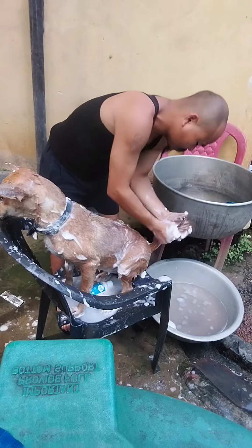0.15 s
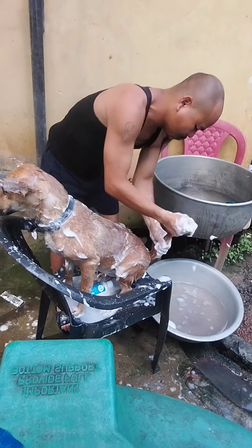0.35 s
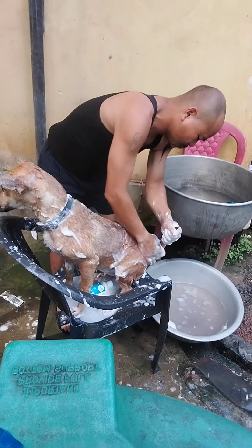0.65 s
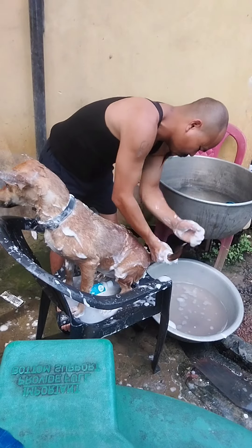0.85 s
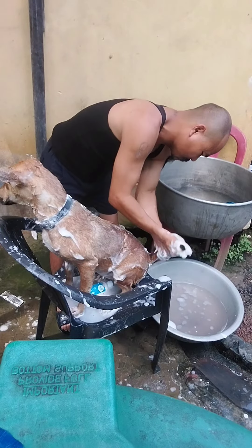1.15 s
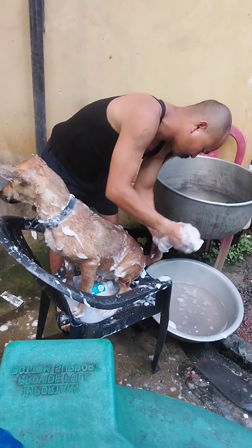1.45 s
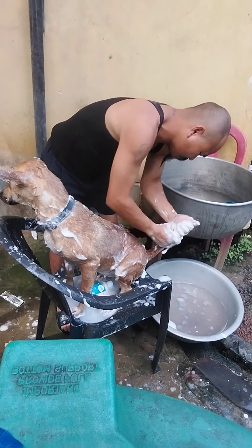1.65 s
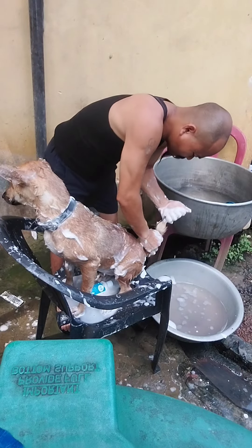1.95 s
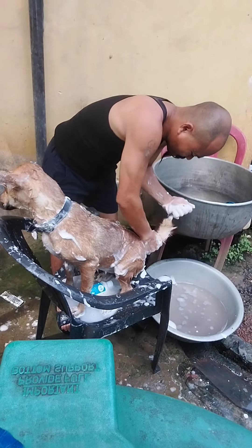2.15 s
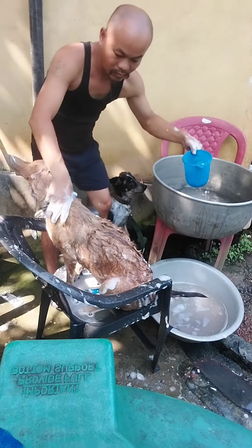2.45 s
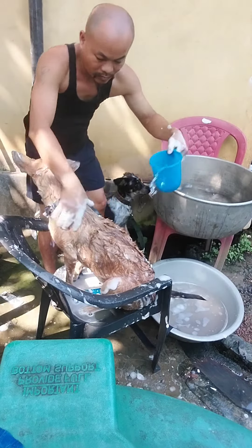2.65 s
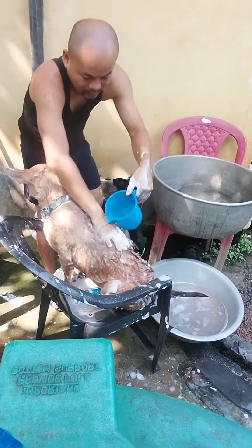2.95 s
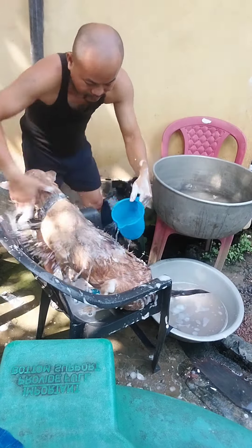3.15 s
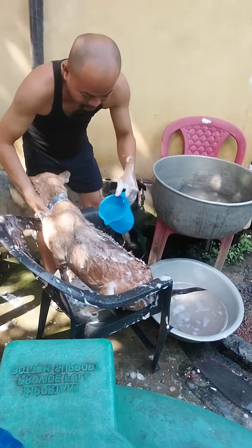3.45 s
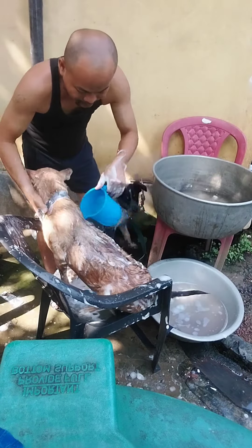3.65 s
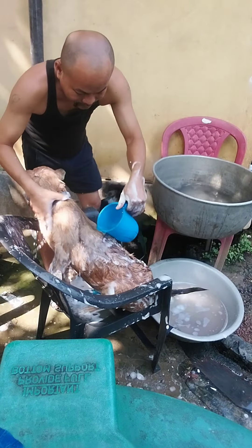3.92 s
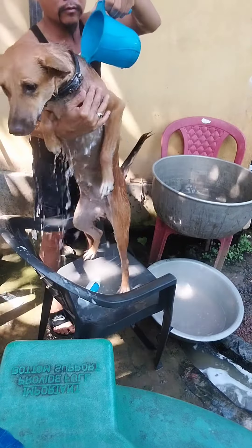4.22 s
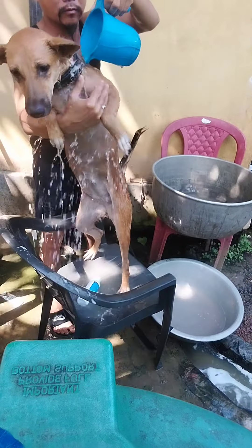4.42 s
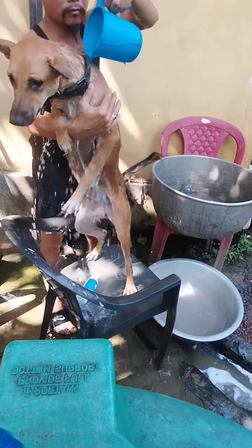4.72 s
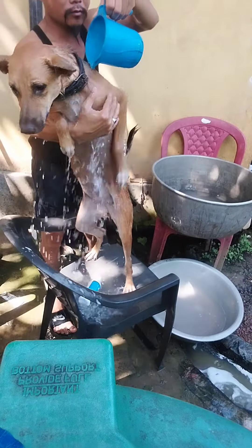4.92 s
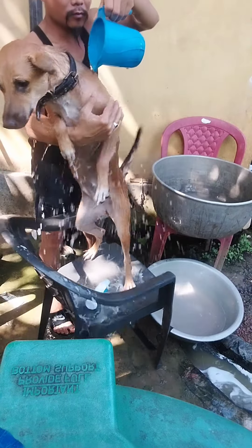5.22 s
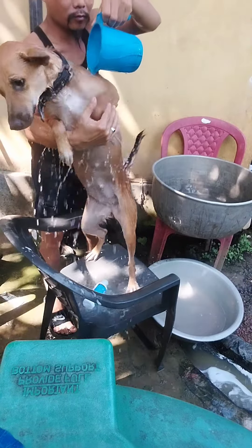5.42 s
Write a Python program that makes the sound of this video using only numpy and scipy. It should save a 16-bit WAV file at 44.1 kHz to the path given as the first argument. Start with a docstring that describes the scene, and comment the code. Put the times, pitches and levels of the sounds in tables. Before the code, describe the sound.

In a small walled yard, wet lather squelches softly through a dog's fur over a far engine drone and bird chirps. After about two seconds a jug dips with bubbly gulps, water pours and trickles, then loud splashes and hollow plastic chair thumps peak twice near the end. Close stereo microphone, slightly dull in the treble.

```python
"""Lather squelches through a dog's fur in a walled yard while a far engine drones and a bird sings; then a jug
is dipped and poured, water splashes, bubbles gulp, and paws thump on a plastic chair, hardest in two bursts
near 4.7 and 5.26 s. Water and yard are flickering bands of noise, splashes are noise bursts, bubbles are
decaying sines. The chair is a bank of ringing modes, the engine a stack of harmonics, the bird a set of
gliding sines. Walls and leaves add diffuse echoes; a stereo microphone colours it all."""
import sys
import numpy as np
from scipy import signal
from scipy.fft import rfft, irfft, next_fast_len
from scipy.io import wavfile
from scipy.ndimage import uniform_filter1d

SR = 44100
rng = np.random.default_rng(int(sys.argv[2]) if len(sys.argv) > 2 else 0)


def to_wav(s):
    """Save 16-bit WAV."""
    ch = np.atleast_2d(s).T  # columns
    pcm = np.round(np.clip(ch, -1, 1) * 32767)  # PCM
    wavfile.write(sys.argv[1], SR, pcm.astype(np.int16))


N = 246092


def amp(db):
    """Decibels to a linear factor."""
    return 10 ** (np.asarray(db) / 20)


def rms_one(x):
    """Scales a signal to an rms of 1."""
    return x / np.sqrt(np.mean(x ** 2) + 1e-20)


def in_time(rows):
    """Draws each column as a curve of straight lines over the whole scene."""
    s, *columns = np.transpose(rows)
    return [np.interp(np.arange(N) / SR, s, column) for column in columns]


def at_hz(points, hz):
    """Reads a curve at a frequency, in straight lines over log frequency."""
    return np.interp(np.log(hz), np.log(np.array(points)[:, 0]), np.array(points)[:, 1])


def drift(rate):
    """Slow random wander of rms 1: lowpassed noise on every 40th sample, joined by lines; rate in Hz."""
    r = np.exp(-80 * np.pi * rate / SR)
    noise = rng.standard_normal(N // 40 + 2002)
    slow = signal.lfilter([1], [1, -2 * r, r * r], noise)[2000:]  # skip the filter's start
    return np.interp(np.arange(N) / 40, np.arange(len(slow)), rms_one(slow))


def ring(x, hz, t60):
    """Two-pole resonance: a unit click sets a decaying sine of height 1 ringing."""
    r, w = amp(-60 / (t60 * SR)), 2 * np.pi * hz / SR
    return signal.lfilter([0, np.sin(w)], [1, -2 * r * np.cos(w), r * r], x + 1e-18)


def fade(t60, length):
    """Exponential decay that loses 60 dB in t60 seconds."""
    return amp(-60 * np.arange(int(length * SR)) / SR / t60)


def add(out, s, sound):
    """Mixes a sound in from s seconds on, cut at the end of the scene."""
    i = int(s * SR)
    out[..., i:i + sound.shape[-1]] += sound[..., :N - i]


def banded(spectrum, patchy_db, flicker, drops_per_s, drop_db):
    """Stereo noise and droplet clicks in third-octave bands that flicker partly together, partly alone; rms 1."""
    # likeness of left and right before it is stretched below: (frequency [Hz], likeness [-1..1])
    likeness = [(60, 0.84), (180, 0.86), (550, 0.68), (1650, -0.27), (4970, 0.0), (15000, -0.02)]
    hz = np.array(spectrum)[:, 0]
    edges = np.geomspace(hz[0], hz[-1], int(3 * np.log2(hz[-1] / hz[0])) + 1)
    sizes = amp(drop_db + 4.6 * np.minimum(rng.exponential(1, N), 4))
    drops = sizes * (rng.random(N) < drops_per_s / SR)
    white = rng.standard_normal((2, 2, N)) * (1 + drops)
    out, together = 0, drift(flicker)
    for k, (low, high) in enumerate(zip(edges, edges[1:])):
        band = signal.butter(2, [low, high], "band", fs=SR, output="sos")
        mid, side = signal.sosfilt(band, white[k % 2])  # neighbouring bands use different noise
        centre = np.sqrt(low * high)
        alike = np.clip(1.52 * at_hz(likeness, centre) - .42, 0, .99)
        gain = amp(at_hz(spectrum, centre) + patchy_db * (together + 0.83 * drift(flicker)))
        out = out + gain * (np.sqrt(1 + alike) * mid + np.sqrt(1 - alike) * side * [[1], [-1]])
    return rms_one(out)


def echoes(x, t60, gap):
    """A diffuse tail from walls and leaves, different at each ear, after a short gap in seconds."""
    tail = rng.standard_normal((2, SR // 2)) * fade(t60, .5) * (np.arange(SR // 2) > gap * SR)
    return signal.fftconvolve(x[None], tail / np.sqrt(np.sum(tail ** 2) / 2), axes=1)[:, :N]


def yard():
    """Low traffic rumble, and above it the rubbing of chair and tub, both as flickering noise."""
    # spectral shapes: (frequency [Hz], relative density [dB per Hz])
    rumble = [(25, -49), (40, 11.5), (58, -4), (90, 15), (140, -8), (250, -31)]
    rubbing = [(60, -41), (110, -2.5), (200, 2.5), (320, -7.5), (500, -15.5), (900, -24), (1500, -91)]
    # low sound of the yard: (time [s], rumble level [dB], rubbing level [dB])
    yard_levels = [(0.0, -57, -55.5), (0.6, -58.5, -51), (1.2, -53, -52), (2.2, -45.5, -52.5),
                   (2.3, -49, -50), (2.86, -50, -52.5), (3.31, -50, -47), (3.63, -58.5, -58),
                   (4.0, -48.5, -51.5), (4.52, -57.5, -51), (4.73, -41, -50), (4.97, -56.5, -47),
                   (5.25, -48.5, -40), (5.42, -52, -41.5), (5.58, -56, -52.5)]
    rumble_db, rub_db = in_time(yard_levels)
    return amp(rumble_db) * banded(rumble, 3.7, 3.8, 0, 0) + amp(rub_db) * banded(rubbing, 1.6, 7.6, 0, 0)


def wash():
    """A far wash of steady smooth noise, partly alike at both ears."""
    # its one band: (low edge [Hz], high edge [Hz], level [dB], end [s])
    low_hz, high_hz, db, end = (1450, 2200, -69, 2.22)
    white = rng.standard_normal((3, int(end * SR)))
    sos = signal.butter(2, [low_hz, high_hz], "band", fs=SR, output="sos")
    band = signal.sosfilt(sos, white[0] + white[1:])
    return np.pad(amp(db) * rms_one(band), ((0, 0), (0, N - band.shape[1])))


def water_levels():
    """Slosh and spray follow the hiss of the flow at offsets held through each stage of the bath."""
    # flow of lather and running water, as its hiss: (time [s], level [dB])
    flow = [(0.0, -59), (0.6, -62), (0.95, -57), (1.33, -59.5), (1.5, -62), (1.86, -66), (2.05, -60.5),
            (2.2, -57), (2.3, -52), (2.52, -51.5), (2.68, -54), (2.86, -59), (2.95, -48.5), (3.09, -55),
            (3.25, -50), (3.65, -64.5), (3.73, -54.5), (3.89, -65), (4.07, -52.5), (4.21, -61), (4.54, -54),
            (4.72, -43), (4.82, -52), (4.95, -53), (5.1, -50), (5.19, -43.5), (5.3, -47), (5.47, -56),
            (5.58, -49.5)]
    # lathering, dipping the jug, pouring, rinsing upright, scrambling, last splashing and thumping that thins out:
    # (start [s], slosh over the hiss [dB], fine spray over the hiss [dB])
    stages = [(0.0, -4.5, -17.5), (2.221, 2, -12.5), (2.8, -7, -11.5), (4.1, -4.5, -4.5), (4.6, -4.5, -7.5),
              (5.232, -1.5, -7)]
    blend_s = 0.086
    (hiss_db,) = in_time(flow)
    s, *columns = np.transpose(stages)
    now = (np.searchsorted(s, np.arange(N) / SR, side="right") - 1).clip(0)
    slosh_over, spray_over = [uniform_filter1d(column[now], int(blend_s * SR) + 1, mode="nearest")
                              for column in columns]
    return hiss_db + slosh_over, hiss_db, hiss_db + spray_over


def water(slosh_db, hiss_db, spray_db):
    """Flowing water in three layers of flickering noise strewn with droplets: slosh, hiss and fine spray."""
    # spectral shapes: (frequency [Hz], relative density [dB per Hz])
    slosh = [(250, -43), (500, -0.5), (900, 2), (1500, 0), (2200, -0.5), (3500, -37)]
    hiss = [(1200, -19), (2200, -0.5), (3200, 2.5), (4700, 7.5), (5800, -3), (7000, -4.5), (8800, -20.5)]
    spray = [(7000, -11), (8500, 16), (10000, -3), (12000, 16), (14000, 7), (17000, 17)]
    return (amp(slosh_db) * banded(slosh, 3.36, 9.7, 110.0, 3.6)
            + amp(hiss_db) * banded(hiss, 1.6, 23.0, 150., 6.5)
            + amp(spray_db) * banded(spray, 1.5, 17.0, 150., 6.4))


def plops(slosh_db):
    """Small bubbles burst at random and ring at their own pitches; only heavy sloshing makes many."""
    sizes = amp(2.5 * np.minimum(rng.exponential(1, N), 3)) * rng.choice([-1, 1], N)
    births_per_s = 500 * amp(1.5 * (slosh_db + 50) + 3 * drift(8))
    born = sizes * (rng.random(N) < births_per_s / SR)
    pitches, dealt = np.geomspace(600, 5500, num=16), rng.integers(0, 16, N)
    rings = []
    for k, hz in enumerate(pitches):
        onset = ring(born * (dealt == k), hz, 1.7 / hz)  # a short first resonance softens the start
        rings.append(ring(onset, hz, 76.0 / hz) * hz ** 1.4)
    left, right = sum(rings[::2]), sum(rings[1::2])
    both = np.array([left + 0.21 * right, right + 0.5 * left])
    return amp(-58) * rms_one(both * amp(slosh_db))


def engine():
    """Orders of a slowly rising, wavering firing rate, swelling and sinking on their long way here."""
    # (multiple of the firing rate, level [dB])
    orders = [(1, -54), (2, -51.5), (3, -54), (4, -60.5), (5, -58.5), (6, -66.5), (10, -76), (11, -73.5),
              (12, -77.5), (13, -86), (14, -77)]
    # lifts the orders in step with their height: (time [s], lift [dB per four orders])
    load = [(0.0, 0), (.75, 0.5), (1.3, 1), (1.7, -2), (2.2, 3.5)]
    start_hz, rise_hz_per_s, end_s = 54.73, 3.0, 2.22
    t, (load_db,) = np.arange(N) / SR, in_time(load)
    firing_hz = (start_hz + rise_hz_per_s * t) * (1 + 0.01224 * drift(4.83))
    phase = 2 * np.pi * np.cumsum(firing_hz) / SR
    drone = 0
    for k, db in orders:
        level = amp(db + load_db * k / 4 + 5.57 * drift(6.4))
        drone = drone + level * np.sin(k * phase + k * k)
    return drone * (t < end_s)


def splashes():
    """Each splash is a ragged burst of noise in a broad resonance, topped by fine spray."""
    # (time [s], relative body level [dB], centre [Hz], t60 [s], relative spray level [dB])
    splash_rows = [(0.399, -47, 4130, 0.57, -60), (.617, -43, 4660, 0.023, -75),
                   (1.023, -39.5, 3530, 0.091, -66), (1.7438, -46, 1720, 0.16, -83.5),
                   (2.22, -40, 1590, 0.18, -50), (2.3107, -35, 1760, 0.45, -41.5),
                   (2.458, -31.5, 5100, 0.07, -58), (2.516, -33, 2390, 0.27, -66),
                   (2.59, -40, 4400, 0.24, -50), (2.6552, -37, 2600, 0.33, -42.5),
                   (2.7013, -37.5, 2960, 0.17, -49), (2.9008, -29.5, 1940, 0.096, -40.5),
                   (2.95, -40.5, 3540, 0.29, -57), (3.21, -33, 4400, 0.022, -30.5),
                   (3.38, -45.5, 4400, 0.86, -49), (3.591, -48, 5000, 0.35, -69.5),
                   (3.686, -43.5, 1860, 0.62, -61.5), (4.0485, -37.5, 4040, 0.13, -43),
                   (4.116, -40.5, 4920, 0.83, -68), (4.4215, -38, 4330, .1, -84),
                   (4.469, -35, 4210, 0.18, -77), (4.582, -35.5, 4000, .06, -58),
                   (4.641, -24.5, 1744, 0.16, -42), (4.6424, -28, 4560, 0.25, -36),
                   (4.6733, -24, 1850, 0.26, -37), (4.711, -20.5, 1540, 0.4, -34),
                   (4.73, -33, 4750, 0.5, -63), (4.847, -26.5, 4340, 0.024, -34),
                   (4.874, -36, 3040, 0.088, -63), (4.979, -31, 3400, 0.23, -34.5),
                   (5.094, -30.5, 4400, 0.14, -37.5), (5.143, -29, 4660, 0.16, -50),
                   (5.1608, -23, 2340, 0.17, -35), (5.17, -26.5, 5100, 0.16, -58),
                   (5.217, -24.5, 4230, 0.11, -34), (5.255, -11.5, 1560, 0.23, -65),
                   (5.259, -23.5, 2880, 0.12, -52), (5.335, -30.5, 2800, 0.18, -36),
                   (5.371, -37, 4850, 0.075, -48), (5.433, -39, 3227, 0.057, -55),
                   (5.44, -41, 5300, .1, -41)]
    out, length = np.zeros((2, N)), .3
    top = signal.butter(4, 9000, "high", fs=SR, output="sos")
    for s, db, hz, t60, spray_db in splash_rows:
        noise = rng.standard_normal((3, int(length * SR)))
        drops = amp(3.4 * np.repeat(rng.standard_normal(60), 256)[:noise.shape[1]])  # drops land unevenly
        drops[:160] = amp(5.5)  # the first contact has a set strength
        burst = (noise[0] + 1.82 * noise[1:]) * fade(t60, length) * drops
        resonance = signal.butter(2, [hz / 1.367, min(hz * 1.24, 7500)], "band", fs=SR, output="sos")
        body = signal.sosfilt(resonance, burst)
        spray = signal.sosfilt(top, burst * (1 + 3 * fade(0.0017, length)))
        add(out, s, amp(db - 8.5) * body + amp(spray_db - 21) * spray)
    return out


def whistle(s, hz, db):
    """A sine gliding along its points of time, pitch and level, with soft ends."""
    t = np.arange(s[0], s[-1], 1 / SR)
    ends = np.clip(np.minimum(t - s[0], s[-1] - t) / 0.0022, 0, 1)
    phase = 2 * np.pi * np.cumsum(np.interp(t, s, hz)) / SR
    return ends * amp(np.interp(t, s, db)) * np.sin(phase)


def chirp(s, hold, top_hz, bottom_hz, db):
    """Holds at the top, drops fast, then levels out; it swells on the way down and fades."""
    fall_s, bend = 0.056, 1.9
    loudest, fade_db = 0.3, 25  # share of the fall; dB times the squared distance from there
    done = np.linspace(0, 1, num=12)
    hz = bottom_hz + (top_hz - bottom_hz) * (1 - done) ** bend
    level_db = db - fade_db * (np.r_[0, done] - loudest) ** 2
    return whistle(np.r_[s, s + hold + fall_s * done], np.r_[top_hz, hz], level_db)


def far_calls():
    """Songbird and faint tone, sines heard mostly as echoes, and a nearer bird whose peeps are drier."""
    # songbird, falling chirps: (time [s], held at the top [s], top [Hz], bottom [Hz], relative level [dB])
    chirp_rows = [(0.849, 0.02, 5690, 3106, -60), (1.283, 0.0067, 4880, 3054, -56.5),
                  (1.995, 0.00197, 5200, 3240, -56.5)]
    # its long rising whistle: (time [s], pitch [Hz], relative level [dB])
    slide_points = [(1.445, 4220, -67), (1.5, 4300, -69), (1.6, 4620, -73), (1.68, 4950, -79),
                    (1.78, 5170, -78), (1.95, 5280, -85)]
    # nearer bird: (time [s], relative level at the start [dB])
    peeps = [(.895, -53), (1.078, -52.5), (1.273, -53)]
    # a faint steady tone far off: (start [s], end [s], base pitch [Hz], relative level [dB])
    start, end, hz, db = (4.25, 4.38, 445, -91)
    # its harmonics: (multiple, added level [dB])
    tone_orders = [(1, 4), (2, -2), (3, 13), (4, 2), (5, 9)]
    rasp_db, rasp_hz = 6.5, 300
    far, near = np.zeros((2, N))
    for row in chirp_rows:
        add(far, row[0], chirp(*row))
    for k, order_db in tone_orders:
        add(far, start, whistle([start, end], [k * hz] * 2, [db + order_db] * 2))
    for s, peep_db in peeps:
        add(near, s, whistle([s, s + 0.018], [3760, 3660], [peep_db, peep_db + 4.5]))
    far = far * amp(rasp_db * drift(rasp_hz))  # chirps and tone flutter on their way through the leaves
    slide = whistle(*np.transpose(slide_points))
    add(far, slide_points[0][0], slide * amp(3 * drift(60))[:len(slide)])  # the slide flutters more gently
    return amp(-2) * far + near + echoes(amp(14.0) * far + amp(-5) * near, 0.47, 0.00085)


def touch(hard_db, depth_db):
    """A paw sinks in over a few ms and drives the low modes; claws and rattle wake the high ones."""
    # plastic chair: (nominal mode [Hz], relative level [dB], t60 [s])
    modes = [(124.6, -19.5, 0.3), (181.2, -12, 0.15), (245, 7.5, 0.054), (283.8, 1.5, 0.105),
             (402, -6, 0.094), (474, -23, 0.19), (542, 1, 0.045), (754, 5, 0.026), (925, 3, 0.016),
             (1284, -16.5, 0.067), (1363, -9, 0.042), (1580, -20, 0.06), (2800, -18, 0.049)]
    sink_s, middle_hz = 0.00059, 239
    t = np.arange(300) / SR / sink_s
    pad = t * t * np.exp(-t)
    hard = .06 * rng.standard_normal(int(.19 * SR)) * fade(.14, .19)  # rattle
    hard[0] += 1  # claw click
    soft = np.convolve(hard, pad / pad.sum())[:len(hard)]
    rings = 0
    for (hz, mode_db, t60), luck in zip(modes, rng.normal(0, 2.5, len(modes))):
        if hz > 500:
            push = amp(hard_db) * hard
        else:
            push = amp(depth_db * np.log2(middle_hz / max(hz, 180))) * soft
        # each touch shifts the level and pitch of every mode a little
        rings = rings + amp(mode_db + luck) * ring(push, hz * (1 + .012 * luck), t60)
    rings[-2000:] *= np.linspace(1, 0, num=2000)
    return rings


def chair():
    """Paws thump on the chair's ringing modes, and it rocks on with further touches after each landing."""
    # (time [s], relative level [dB], hardness [dB], strength of the rebounds [dB],
    #  depth: gain toward the low modes [dB per octave])
    thumps = [(2.222, -30.5, -13, 0.5, 4), (3.5, -41.5, -7, 8.5, -9), (4.558, -20, -16.5, 1, -6),
              (4.59, -26, -15.5, -10, -8), (4.674, -20, -11.5, 8, 0), (4.703, -27.5, 0, -12, 0),
              (4.7105, -1.5, -15.5, -17, 6), (4.727, -7, -40, -9.5, 14), (4.763, -17.5, -16.5, -5.5, 10),
              (4.883, -18.5, -18, -23, -5), (5.019, -29.5, -16, 7.5, 13), (5.079, -23.5, -28, -12, -0.5),
              (5.18, -16, -20, -16, -7), (5.198, -19.5, -18, -4, -2), (5.2574, -2, -10.5, -8, 0),
              (5.2612, -3.5, -11, -9.5, 4), (5.299, -13, -13.5, -10, 17), (5.343, -19, -14.5, 0, 11),
              (5.528, -32, -37, -2, -2), (5.572, -30.5, -14, -10, -5)]
    # (delay after the landing [s], relative level [dB])
    rebounds = [(0.0202, -7.5), (.048, -17.5), (.086, -12)]
    rebound_softer_db = 7.5  # less hardness
    out = np.zeros(N)
    touches = [(s, db, hard_db, depth_db) for s, db, hard_db, _, depth_db in thumps]
    for s, db, hard_db, again_db, depth_db in thumps:
        for lag, loss_db in rebounds:
            touches.append((s + lag, db + again_db + loss_db, hard_db - rebound_softer_db, depth_db))
    for s, db, hard_db, depth_db in touches:
        # touches due after the end start in the last millisecond
        add(out, min(s, N / SR - .001), amp(db - 6.0) * touch(hard_db, depth_db))
    dulled = signal.lfilter([.3], [1, -.7], out)
    out = signal.sosfilt(signal.butter(4, 135, "high", fs=SR, output="sos"), dulled)
    return (out + amp(-19.5) * echoes(out, 0.15, 0.01)) * amp([[.6], [-.6]])


def gurgles_and_rushes():
    """Noise swelling in a resonance: low rows gurgle, high rows are narrow rushes of splashing water."""
    # (start [s], end [s], centre [Hz], relative level [dB])
    swell_rows = [(3.16, 3.33, 269, -47.5), (3.274, 3.42, 350, -41.5), (3.871, 4.133, 308, -50),
                  (2.235, 2.348, 317, -47), (2.58, 2.713, 282, -47.5), (2.656, 2.739, 1130, -50.5),
                  (2.40, 2.47, 2070, -49), (2.474, 2.526, 1370, -46), (2.597, 2.687, 4050, -55),
                  (3.56, 3.644, 4200, -57), (3.655, 3.782, 1550, -56), (5.164, 5.191, 4970, -33.5)]
    out = np.zeros(N)
    for start, end, hz, db in swell_rows:
        swell = np.hanning(int((end - start) * SR))
        resonant_noise = rms_one(ring(rng.standard_normal(len(swell)), hz, 26.5 / hz))
        add(out, start, amp(db) * swell * resonant_noise)
    return out


def bubbles():
    """A trapped pocket of air rings some thirty cycles and rises in pitch as it nears the surface."""
    # the largest bubbles and drops: (time [s], relative level [dB], starting pitch [Hz])
    bubble_rows = [(2.25, -34.5, 997), (2.26, -44, 4200), (2.269, -39, 856), (2.269, -29, 4570),
                   (2.308, -16, 1063), (2.324, -23.5, 3720), (2.366, -25.5, 1097), (2.39, -25, 1690),
                   (2.411, -26.5, 1990), (2.429, -31, 1930), (2.46, -24, 4800), (2.461, -32, 5600),
                   (2.495, -28, 756), (2.516, -26, 3460), (2.519, -30.5, 716), (2.545, -29.5, 1740),
                   (2.59, -41.5, 487), (2.657, -22, 3950), (2.66, -37, 1180), (2.70, -34, 2750),
                   (2.794, -41, 950), (2.901, -34, 1930), (2.92, -32, 1860), (3.701, -38, 1510),
                   (4.049, -40.5, 1610), (4.613, -24.5, 3000), (4.642, -25.5, 1500), (4.743, -33, 5100),
                   (4.875, -27.5, 3000), (5.065, -28, 2630), (5.193, -22, 1740), (5.214, -19.5, 2800),
                   (5.223, -25, 1340), (5.335, -29, 2880)]
    rise_s, big_rise_s, big_db = 0.0026, 0.00056, -22  # the loud, big ones burst almost at once
    out, t = np.zeros(N), np.arange(int(.15 * SR)) / SR
    for s, db, hz in bubble_rows:
        onset = 1 - np.exp(-t / (big_rise_s if db > big_db else rise_s))
        shape = fade(23.6 / hz ** .97, .15) * onset
        add(out, s, amp(db + 1.5) * shape * np.sin(2 * np.pi * hz * (t + 1.0 * t * t)))
    return (out + amp(-1.5) * echoes(out, 0.12, 0.0016)) * amp([[2.5], [-2.5]])


def scene():
    """Sums yard, water, engine, calls and paws in stereo."""
    slosh_db, hiss_db, spray_db = water_levels()
    background = yard() + wash() + engine() + far_calls()
    flowing = water(slosh_db, hiss_db, spray_db) + plops(slosh_db)
    return background + flowing + splashes() + chair() + gurgles_and_rushes() + bubbles()


def record(dry):
    """The microphone dips in the treble, its two ports differ in colour; peaks are rounded, the top is cut."""
    # (frequency [Hz], left minus right [dB])
    ports = [(60, -3), (120, -2), (240, -1.5), (480, -8), (950, -2.5), (1890, 0.5), (3770, -8),
             (7520, -9.5), (15000, 1.5)]
    # treble dip: (frequency [Hz], gain [dB])
    mic_dip = [(6000, -1.5), (7300, -7), (8300, -19), (9300, -9), (11000, 0)]
    cutoff_hz = 15850
    size = next_fast_len(N + SR // 4)
    hz = np.arange(size // 2 + 1) * SR / size + 1
    tilt_db = at_hz(ports, hz) / 2
    response = amp(at_hz(mic_dip, hz) + [tilt_db, -tilt_db])
    ported = irfft(rfft(dry, size) * response, size)[:, :N]
    rounded = 1.2 * np.tanh(ported / 1.2)
    return signal.sosfilt(signal.ellip(9, .5, 65, cutoff_hz, fs=SR, output="sos"), rounded)


dry = scene()
out = record(dry)
to_wav(out)
```